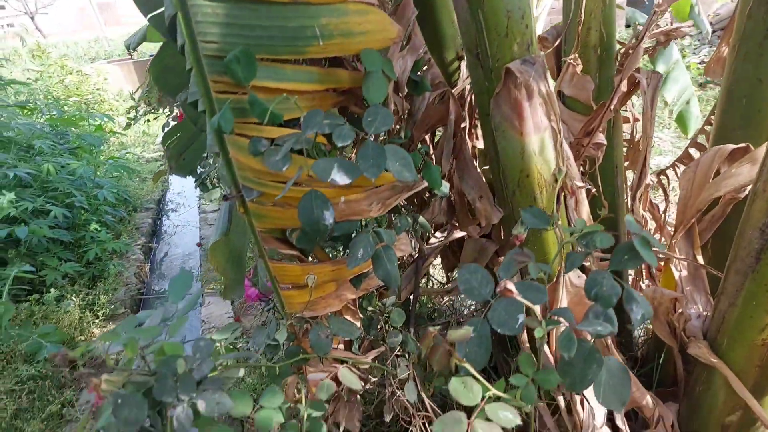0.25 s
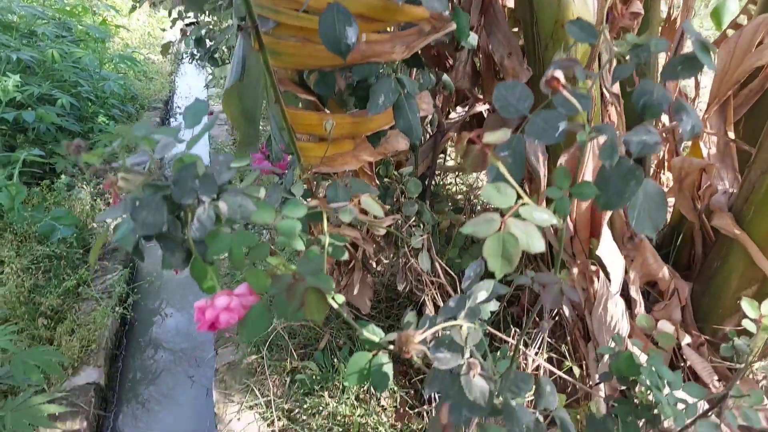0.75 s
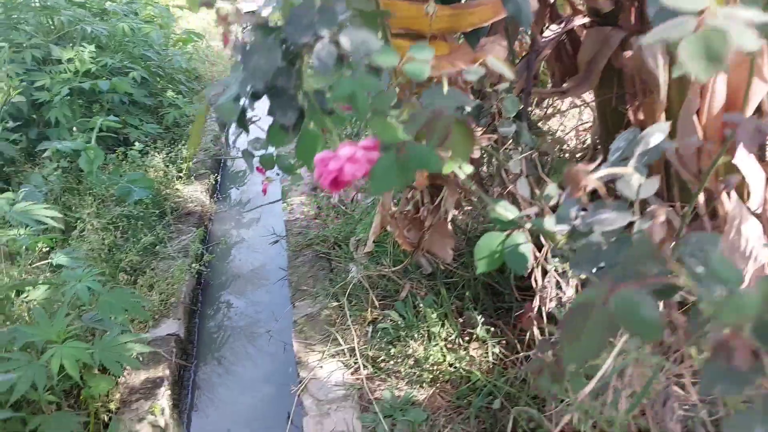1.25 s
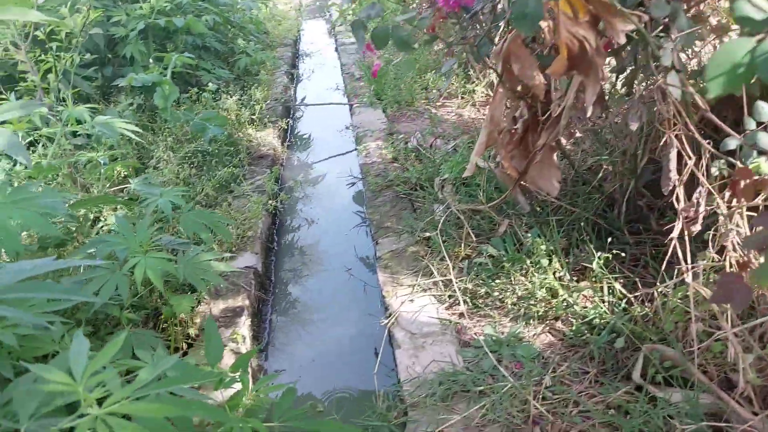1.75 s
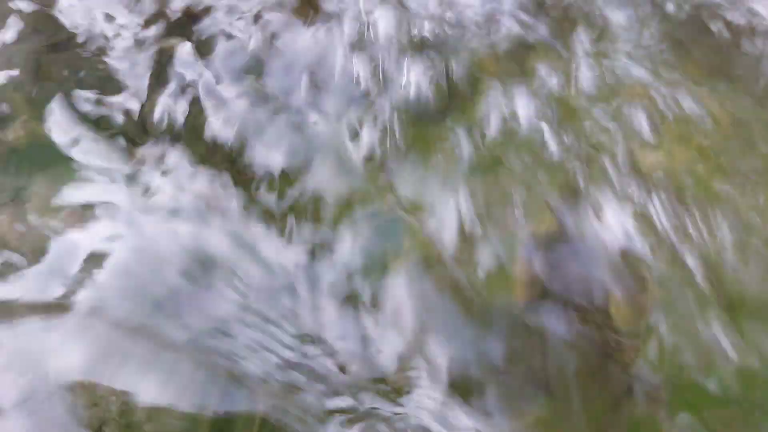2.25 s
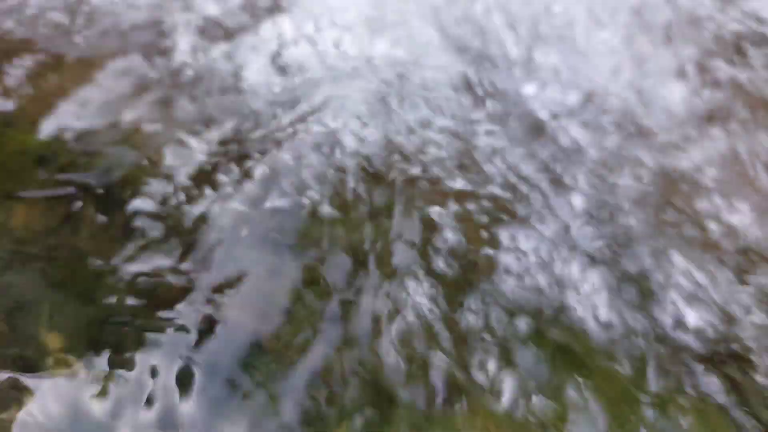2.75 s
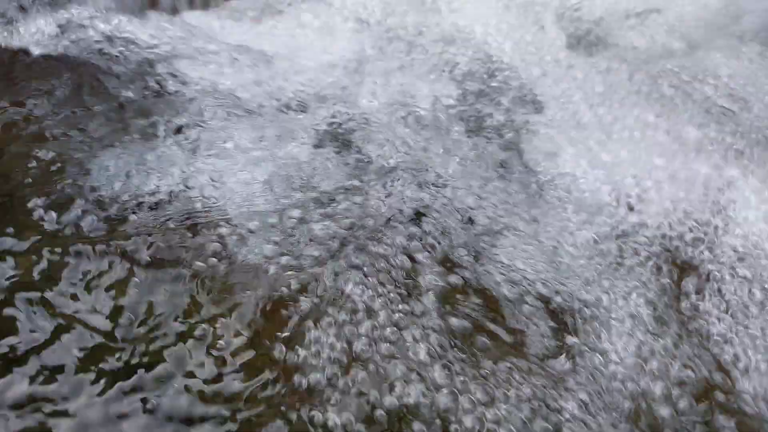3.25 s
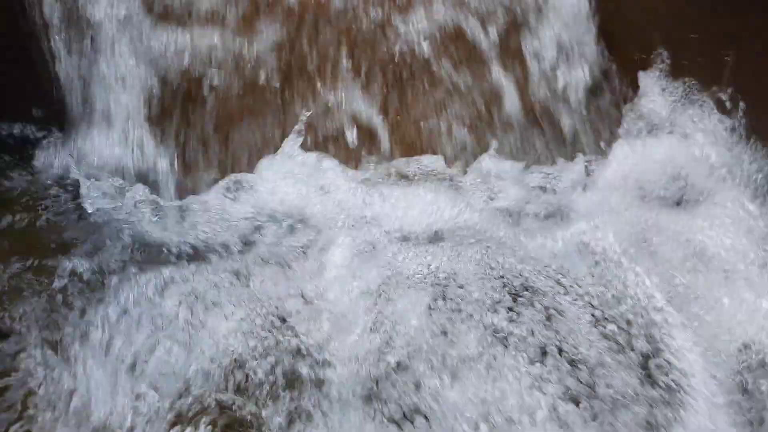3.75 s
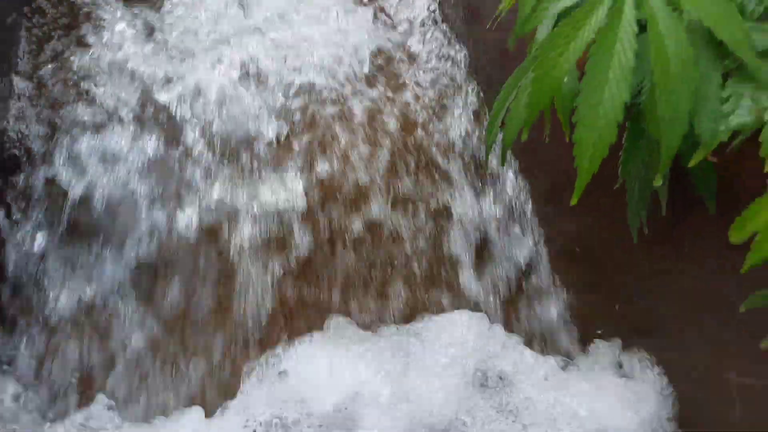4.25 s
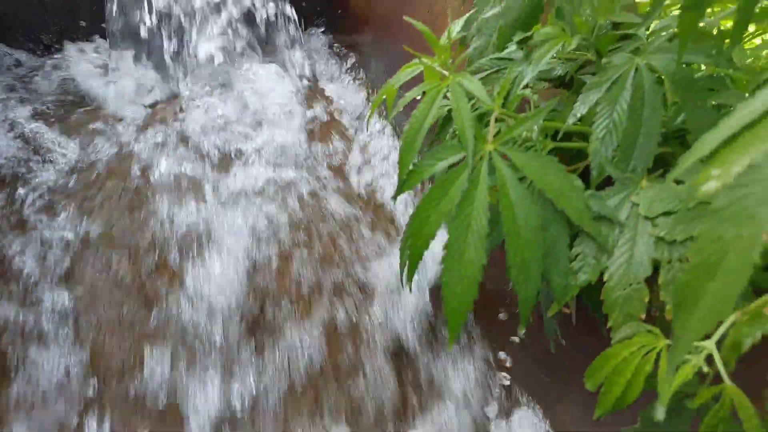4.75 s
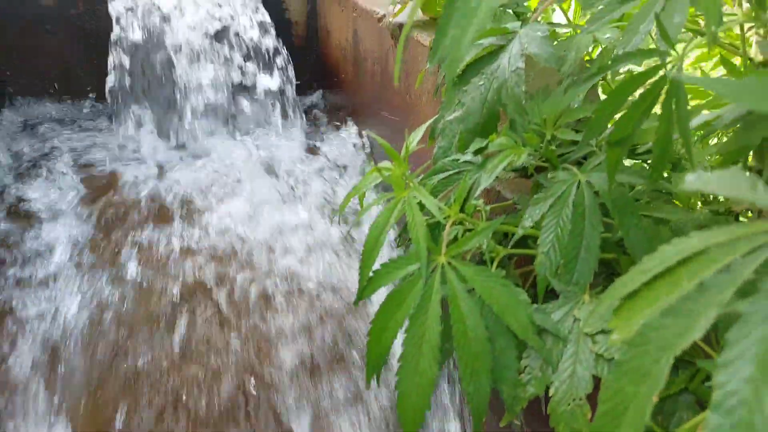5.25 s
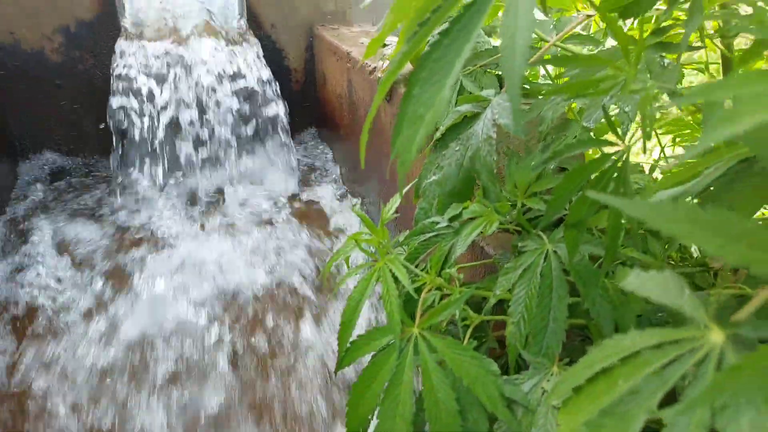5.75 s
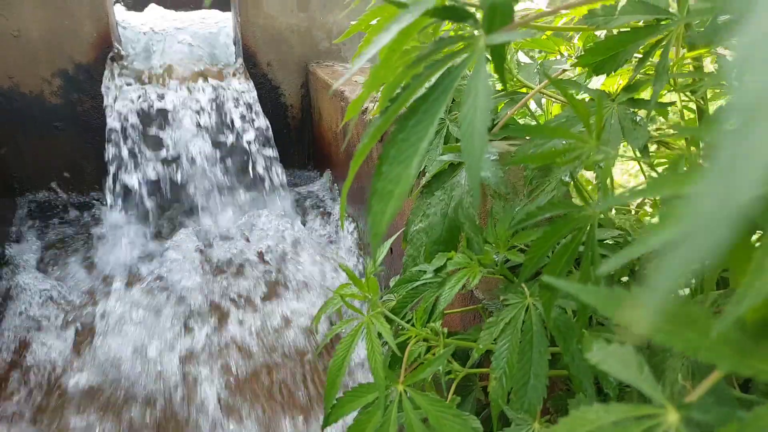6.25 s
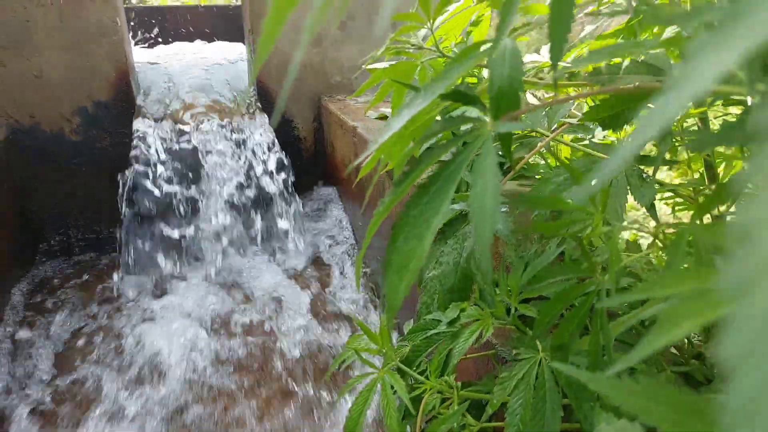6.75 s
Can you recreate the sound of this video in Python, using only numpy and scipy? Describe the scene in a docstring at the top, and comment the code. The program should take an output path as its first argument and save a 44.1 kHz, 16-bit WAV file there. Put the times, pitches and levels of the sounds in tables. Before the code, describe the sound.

For nearly two seconds there is only soft, distant running water with a dull low rumble and faint hum. After a tiny hush, heavy water gushes suddenly and stays loud to the end. The close stereo microphone catches dense wash, fizzing spray, rising bubble tones and wet slaps between concrete walls, becoming fuller and deeper as it approaches the falling jet.

```python
"""A faint rush from far down a garden channel is heard first; after a near-silent moment water gushes close by.
Pumped water falls from a concrete outlet into a basin, and the microphone moves upstream over the foam to the fall.
The water is noise swelling in octave bands, ringing bubbles and snapping drops, driven by shared random surges.
Hollow gulps are short rising tones; slaps and splashes are noise bursts; a faint wavering hum lies under the far rush.
Distance and place are set by level, spectrum and one gliding echo, heard at two microphone ports."""
import sys
import numpy as np
from scipy import signal
from scipy.fft import rfft, irfft
from scipy.io import wavfile
from scipy.ndimage import uniform_filter1d

SR = 44100
rng = np.random.default_rng(int(sys.argv[2]) if len(sys.argv) > 2 else 0)


def bounce(signal):
    """Save signal as a 16-bit WAV file at the path given by the first command-line argument."""
    frames = np.transpose(np.atleast_2d(signal))
    limited = np.clip(frames, -1, 1)
    pcm = np.round(limited * 32767).astype(np.int16)
    wavfile.write(sys.argv[1], SR, pcm)


N = 308700
TIME = np.arange(N) / SR
BINS = np.fft.rfftfreq(N, 1 / SR)

# Colour of the near water at four places along the walk.
# Each row: frequency in Hz, left and right port in relative dB.
RUNOFF_COLOUR = [(30, -30, -38), (60, -21, -20), (125, -8, -9.5), (330, -8.5, -9), (576, -4.5, -0.5),
                 (620, -6.5, -9.5), (950, -5.5, -5), (1500, -12, -7), (2060, -17, -7.5), (3200, -23.5, -16),
                 (4800, -25, -16), (6900, -25.5, -6.5), (8300, -26, -30), (9760, -26.5, -24.5),
                 (12240, -25, -9.5), (15500, -29, -32)]
FOAM_COLOUR = [(30, -22, -26), (60, -21, -18), (128, -11.5, -12.5), (252, -9, -8.5), (460, -9.5, -6.5),
               (614, -6, -5.5), (1270, -13, -8.5), (2060, -13.5, -8), (3020, -18, -11.5),
               (4560, -20.5, -11), (6570, -19, -4.5), (7900, -23, -26.5), (9760, -23, -23.5),
               (12000, -22, -8), (15500, -23, -31)]
APRON_COLOUR = [(30, -25, -25), (60, -14, -23), (129, -12, -7), (196, -10.5, -15), (320, -7, -3.5),
                (790, -9.5, -8.5), (990, -6.5, -3.5), (1530, -10.5, -6.5), (2130, -11.5, -3),
                (2850, -17, -11.5), (3760, -19, -9), (5750, -19, -7), (8040, -20, -29), (10000, -19, -20.5),
                (11900, -19, -13), (15500, -19, -28)]
FALL_COLOUR = [(30, -31.0, -7), (60, -14, -4.5), (129, -0.5, 0), (191, -4.5, -7), (330, 2, 4),
               (1030, 0, 2.5), (1460, -11.5, -3.5), (2020, -12, -3.5), (2750, -17, -9.5), (5660, -21, -11),
               (6330, -17, -21.5), (7900, -20.5, -28), (10000, -18.5, -25.5), (11800, -20, -20),
               (16200, -21, -40)]
# Times in seconds when the microphone is over the runoff, the foam, the apron and the fall.
NEAR_PLACE_TIMES = [2.35, 3.3, 4.65, 5.9]

# Colour of the far water among the plants and on the open bank.
# Each row: frequency in Hz, left and right port in relative dB.
PLANTS_COLOUR = [(30, -22, -13), (57, -10, -2), (80, -16, -8.5), (122, -3.5, 2.5), (347, -17.5, -14.5),
                 (620, -14, -12), (1020, -12, -11.5), (1200, -26, -19), (1520, -20, -17), (1730, -25, -18),
                 (1930, -21, -10.5), (2600, -28, -20), (3220, -29.5, -26.5), (7500, -35, -28),
                 (9500, -37, -35.5), (13000, -38, -26), (16000, -43, -49)]
BANK_COLOUR = [(30, -22, -2), (80, -9, -2.5), (112, -5, 3), (160, -10, -9), (240, -12, -7),
               (344, -20.5, -19), (1070, -18.5, -15.5), (1320, -23, -21.5), (2000, -30, -22),
               (2670, -29, -18.5), (3350, -34, -31), (7600, -38, -28.5), (9500, -37, -37.5),
               (13000, -39, -29.5), (16000, -40, -46)]
# Times in seconds when the microphone is among the plants and on the open bank.
FAR_PLACE_TIMES = [0.35, 1.6]

# Level of the water along the way, before gushes and sloshing.
# Each row: time in seconds, churning in dB, splashing in dB.
NEAR_LEVELS = [(1.98, -26.5, -27), (2.7, -26.5, -28.5), (3.7, -26, -27.5), (4.8, -26.5, -26.5),
               (5.6, -26.5, -27.5), (6.2, -28, -28.5), (7.0, -26, -29)]
FAR_LEVELS = [(0, -48.5, -54), (0.85, -47, -52.5), (1.35, -48, -50.5), (1.7, -47, -53), (1.8, -44, -52)]
# Gushes from the pump. Each row: crest in seconds, lift of the churning in dB, lift of the splashing in dB.
PUMP_GUSHES = [(1.22, 2, 1), (1.39, 1, 0.5), (2.1, 1.5, 3.5), (2.29, 0.5, 3), (2.42, 2, 3), (2.53, -2, 1),
               (2.95, -1, 3), (3.36, 3.5, 1), (4.39, 1.5, 1.5), (4.55, 3, -0.5), (4.83, 0.5, 2.5),
               (5.35, 2.5, 2.5), (5.61, 1, 0.5), (6.47, 3.5, -1)]

# Air pockets ringing under the water. Each row: crest in seconds, pitch in Hz, peak in dB before trim.
AIR_POCKETS = [(2.071, 490, -19), (2.201, 565, -18), (2.226, 550, -16), (2.317, 550, -14),
               (2.369, 750, -23), (2.431, 550, -20), (2.523, 550, -18.5), (2.563, 555, -20.5),
               (2.611, 380, -21.5), (2.67, 390, -20), (2.765, 343, -14.5), (2.768, 242, -14.5),
               (2.797, 750, -19), (2.873, 344, -17.5), (2.927, 219, -17.5), (2.954, 535, -17),
               (2.962, 231, -15), (3.007, 267, -15), (3.143, 191, -20.5), (4.031, 420, -17.5),
               (4.115, 613, -12), (4.229, 412, -18), (4.276, 394, -19), (4.355, 460, -22),
               (4.48, 592, -17.5), (4.551, 340, -19.5), (4.637, 325, -19), (4.662, 316, -19.5),
               (4.779, 520, -21), (4.909, 592, -22), (4.956, 496, -14.5), (5.018, 372, -19.5),
               (5.032, 286, -12), (5.09, 318, -19.5), (5.334, 355, -21), (5.451, 201, -27),
               (5.573, 317, -18), (5.783, 800, -13), (5.97, 528, -4.5), (6.329, 332, -20.5),
               (6.426, 750, -20), (6.484, 318, -25), (6.524, 930, -15), (6.605, 277, -19),
               (6.686, 585, -20.5), (6.886, 1076, -14)]
# Sharp splashes. Each row: start in seconds, level in dB before trim.
SPLASH_EVENTS = [(0.8594, -35.5), (1.3728, -39), (1.7699, -36), (2.1565, -10), (3.832, -9.5), (3.893, -10),
                 (3.901, -15), (4.701, -10.5), (5.029, -12), (5.3353, -12.5), (6.9446, -8.5)]
# Lumps of water slapping the pool. Each row: start in seconds, level in dB before trim.
SLAP_EVENTS = [(0.44, -34), (2.034, -14), (2.083, -17), (2.104, -12.5), (2.358, -7), (2.412, -9.5),
               (2.461, -12), (2.532, -14), (3.296, -14), (4.061, -12.5), (4.474, -14.5), (4.8, -13),
               (4.906, -9.5), (5.381, -13), (5.562, -17), (5.774, -7.5), (5.887, -10.5), (6.44, -13.5),
               (6.818, -13)]
# Spectra of the splashes and the slaps. Each row: frequency in Hz, relative level in dB.
SPLASH_SPECTRUM = [(500, -25), (2000, -8), (4800, 6.5), (8500, -1.5), (12000, 0.5), (16000, -14)]
SLAP_SPECTRUM = [(150, -13.5), (500, -6), (900, 2), (1500, -3.5), (2300, -12), (5000, -28), (16000, -48)]

# Resonances of the air between the concrete walls. Each row: frequency in Hz, width in Hz, lift in dB.
BASIN_RESONANCES = [(131, 25, 5.4), (239, 40, 2.2), (343, 50, 3)]
# One reflection, gliding as the microphone moves.
# Each row: time in seconds, left delay in seconds, right delay in seconds, signed strength.
WALL_REFLECTION = [(1.96, 0.0059, 0.0047, -0.25), (2.3, 0.0065, 0.0044, -0.38), (3.3, .0068, .00455, -0.18),
                   (4.2, 0.0056, 0.0044, 0.047)]
GROUND_REFLECTION = [(0, 0.0013, 0.0019, 0.11), (.7, 0.0013, 0.0016, 0.15), (1.2, 0.00174, 0.0021, 0.069),
                     (1.8, 0.0021, 0.00195, 0.33)]
# Hollow in the right-hand hiss, sliding down as the microphone tilts up to the fall.
# Each row: time in seconds, centre in Hz.
HISS_HOLLOW = [(2.0, 6800), (2.8, 6300), (3.75, 5800), (4.15, 5200), (4.5, 4850), (5.0, 4400), (5.9, 3520),
               (7.0, 3230)]
# Likeness of the two microphone ports. Each row: frequency in Hz, coherence from 0 to 1.
PORT_LIKENESS = [(40, 0.9), (150, 1), (400, 0.97), (600, 0.79), (900, 0.52), (1400, 0.37), (2200, 0.19),
                 (5000, 0.008), (12000, 0.036)]
# Hum from place to place. Each row: time in seconds, fundamental in dB, octave in dB, both before trim.
HUM_LEVELS = [(0.05, -59, -69), (0.42, -50.5, -67), (0.8, -69, -59), (1.08, -75, -57), (1.22, -52, -51.5),
              (1.46, -50, -59), (1.7, -62, -69)]

FAR_END_S, NEAR_START_S = 1.8, 1.9615
PORT_LAG_S = 0.000459  # the right port hears the treble this much later, the bass less
EDGE_HZ = 16000
GUSH_RISE_S, GUSH_FALL_S = 0.04, 0.043  # every gush swells and ebbs alike
SLOSH_HZ = 5.1  # the near pool sloshes at random
GULP_SWELL_S, GULP_SWELL_HZ = 0.0055, 447.8  # swell time of a gulp of this pitch; lower ones last longer
GULP_BURST_DB, GULP_HALVING_DB = -19, 20  # above this level, half the swell time for every such step


def near_water(surge_db=1.06, foam_bubbles_db=-6, clear_bubbles_db=-8.0, spray_db=-4, slosh_db=.5):
    """The jet plunges into the basin: wash, bubbles and spray surge together."""
    surge = surge_db * surges(per_s=110, decay_s=.014)
    water = wash(surge, patchy_db=1.93, patch_hz=45, bass_share=0.73)
    # bubbles smothered in foam ring briefly, those in clear water longer
    water += gain_of(foam_bubbles_db) * bubbles(surge, per_s=1000, cycles=3.6, rise=0.04, spread_db=1.5)
    water += gain_of(clear_bubbles_db) * bubbles(surge, per_s=260, cycles=11.86, rise=0.021, spread_db=2.5)
    water += gain_of(spray_db) * spray(surge, per_s=2200, spread_db=3.5, tick_s=0.00092)

    heard = ports(enclosed(water, BASIN_RESONANCES))
    heard = echoed(heard, WALL_REFLECTION)
    places = [RUNOFF_COLOUR, FOAM_COLOUR, APRON_COLOUR, FALL_COLOUR]
    heard = hollowed(carried(heard, places, NEAR_PLACE_TIMES))
    lift = gushing() + slosh_db * wander(SLOSH_HZ)
    return flowing(heard, NEAR_LEVELS, lift)


def wash(surge_db, patchy_db, patch_hz, bass_share):
    """Countless merged bubbles: every octave follows the surges and also seethes by itself."""
    white = rfft(rng.standard_normal((2, N)))
    out = np.zeros((2, N))
    centres = np.geomspace(100, 12800, 8)
    for centre, pick in zip(centres, np.eye(len(centres))):
        weight = np.interp(np.log(BINS + 1), np.log(centres), pick)
        band = irfft(white * weight, N)
        surge_share = np.interp(centre, [200, 3000], [bass_share, 1])
        out += band * gain_of(surge_share * surge_db + patchy_db * wander(patch_hz))
    return evened(out)


def bubbles(surge_db, per_s, cycles, rise, spread_db, count=14):
    """Each bubble rings for a few cycles, rising in pitch as it nears the surface; small ones are commoner."""
    out = np.zeros((2, N))
    edges = np.geomspace(160, 5000, count + 1)
    for low, high in zip(edges, edges[1:]):
        life = cycles / high * (high / 600) ** 0.44
        t = np.arange(int(5 * life * SR)) / SR
        chance = per_s / count * np.sqrt(high / 1000) * gain_of(surge_db) / SR
        side, at = np.nonzero(rng.random((2, N)) < chance)
        pitch, size = rng.random((len(at), 2)).T[:, :, None]
        hz = low * (high / low) ** pitch
        tone = np.sin(2 * np.pi * hz * t * (1 + rise * t / life))
        ring = tone * np.exp(-t / life) * (1 - np.exp(-t * high))
        ring *= gain_of(spread_db * np.minimum(-np.log(size), 3.5))  # a few are much louder
        # sum all rings of this size group into both channels at once
        places = (side * N + at)[:, None] + np.arange(len(t))
        group = np.bincount(places.ravel(), ring.ravel(), 2 * N)[:2 * N].reshape(2, N)
        out += np.sqrt(high) * evened(group)
    return evened(out)


def spray(surge_db, per_s, spread_db, tick_s):
    """Drops snap on the surface, each with its own small delay between channels and a short hiss."""
    at = np.flatnonzero(rng.random(N) < per_s * gain_of(2 * surge_db) / SR)
    size = gain_of(spread_db * np.minimum(rng.exponential(1, len(at)), 4))
    size = size * rng.choice([-1, 1], len(at))
    drops = np.zeros((2, N))
    late = np.minimum(at + rng.integers(0, 32, len(at)), N - 1)
    drops[0, late] = size
    drops[1, at] = size
    patter = signal.lfilter([1], [1, -np.exp(-1 / (tick_s * SR))], drops ** 2)
    hiss = np.sqrt(patter) * rng.standard_normal((2, N))
    return evened(evened(drops) + hiss)


def surges(per_s, decay_s):
    """Lumps of water land at random: each raises the noise at once and dies away."""
    lumps = (rng.random(N) < per_s / SR) * rng.uniform(.3, 1, N)
    shots = signal.lfilter([1], [1, -np.exp(-1 / (decay_s * SR))], lumps)
    return evened(shots - shots.mean())


def gushing():
    """Level change of the churning and of the splashing in dB: each gush builds to its crest and ebbs."""
    total = 0
    for s, *lifts in PUMP_GUSHES:
        width = np.where(TIME < s, GUSH_RISE_S, GUSH_FALL_S)
        total = total + np.outer(lifts, np.exp(-((TIME - s) / width) ** 2))
    return total


def gulps(trim_db=-1.0, left_over_right_db=-2, rise=0.021, wobble=0.058):
    """A trapped air pocket swells, rings a few wobbling cycles with rising pitch and is smothered by foam."""
    out = np.zeros(N)
    for s, hz, db in AIR_POCKETS:
        swell = GULP_SWELL_S * (GULP_SWELL_HZ / hz) ** (2 / 3)
        swell *= .5 ** (max(db - GULP_BURST_DB, 0) / GULP_HALVING_DB)  # loud ones burst sooner
        t = np.arange(-4 * swell, 4 * swell, 1 / SR)
        # the current kneads the pocket
        jolts = evened(uniform_filter1d(rng.standard_normal(SR), size=round(2 * SR / hz)))[:len(t)]
        turns = hz * t * (1 + rise * t / swell / 2) + wobble * jolts + rng.random()
        envelope = gain_of(db + trim_db) * np.exp(-(t / swell) ** 2 / 2)
        add(out, s + t[0], envelope * np.sin(2 * np.pi * turns))
    return balanced(out, left_over_right_db)


def crackles(events, colour, trim_db, rise_s, decay_s, left_over_right_db):
    """Thrown water slaps down and scatters into a short crackle: a burst of uneven noise."""
    out = np.zeros((2, N))
    t = np.arange(3000) / SR
    for s, db in events:
        grains = gain_of(2.7 * rng.standard_normal(len(t)))
        crackle = evened(rng.standard_normal((2, len(t))) * grains)
        envelope = np.exp(-t / decay_s) * (1 - np.exp(-t / rise_s))
        add(out, s, gain_of(db + trim_db) * crackle * envelope)
    shape = evened(gain_of(read(colour, BINS)))
    return balanced(irfft(rfft(ports(out)) * shape, N), left_over_right_db)


def thump(at_s=6.222, hz=60, level_db=-23, length_s=0.0055):
    """One soft, low bump, mostly on the right: a sine under a bell-shaped swell."""
    t = TIME - at_s
    bump = gain_of(level_db) * np.exp(-(t / length_s) ** 2 / 2) * np.sin(2 * np.pi * hz * t)
    return bump * np.array([[.3], [1]])


def far_water(surge_db=0.9, bubbles_db=-8.0, spray_db=-8):
    """From down the channel: a low rumble and a soft, trickling rush of wash, bubbles and spray."""
    surge = surge_db * surges(per_s=80, decay_s=0.015)
    water = wash(surge, patchy_db=2.8, patch_hz=30, bass_share=0.63)
    water += gain_of(bubbles_db) * bubbles(surge, per_s=750, cycles=11.2, rise=0.02, spread_db=2.5)
    water += gain_of(spray_db) * spray(surge, per_s=980, spread_db=3.5, tick_s=0.00077)
    heard = echoed(ports(water), GROUND_REFLECTION)
    heard = carried(heard, [PLANTS_COLOUR, BANK_COLOUR], FAR_PLACE_TIMES)
    return flowing(heard, FAR_LEVELS, gushing())


def pump(hz=89.0, trim_db=1, waver=0.0061, left_over_right_db=-2.0):
    """A faint hum and its octave, likely the distant pump, wavering slightly in pitch."""
    s, *levels = np.transpose(HUM_LEVELS)
    turns = np.cumsum(hz * (1 + waver * wander(1.8))) / SR
    hum = np.zeros(N)
    for harmonic, db in enumerate(levels, 1):
        hum += gain_of(np.interp(TIME, s, db) + trim_db) * np.sin(2 * np.pi * harmonic * turns)
    return balanced(np.sqrt(2) * hum, left_over_right_db)  # table levels are rms


def enclosed(x, modes):
    """The air between the concrete walls rings in a few low modes."""
    ring = 1 + sum((gain_of(db) - 1) / (1 + 2j * (BINS - hz) / width) for hz, width, db in modes)
    return irfft(rfft(x) * ring, N)


def ports(x):
    """Two microphone ports: alike in the bass, nearly unrelated in the treble, the right one late."""
    left, other = rfft(x)
    same = np.clip(read(PORT_LIKENESS, BINS), 0, 1)
    lag = PORT_LAG_S * BINS / np.hypot(BINS, 1200)
    right = same * left + np.sqrt(1 - same ** 2) * other
    right = right * np.exp(-2j * np.pi * BINS * lag)
    return irfft(np.array([left, right]), N)


def echoed(x, path):
    """Adds one reflection with a gliding delay, which combs the rush."""
    s, *delays, strength = np.transpose(path)
    late = [np.interp(TIME - np.interp(TIME, s, delay), TIME, side) for side, delay in zip(x, delays)]
    return x + np.interp(TIME, s, strength) * np.array(late)


def carried(x, places, times):
    """The colour glides from place to place as the microphone is carried along."""
    hz, t, z = signal.stft(x, SR, nperseg=2048)
    nearness = np.array([np.interp(t, times, pick) for pick in np.eye(len(places))])
    colours = np.array([[read(place, hz, axis=side + 1) for place in places] for side in range(2)])
    glide_db = colours.transpose(0, 2, 1) @ nearness
    audible = (hz > 25)[:, None]
    return signal.istft(z * gain_of(glide_db) * audible, SR)[1][:, :N]


def hollowed(x, depth_db=12.0, width_hz=900):
    """Carves the gliding hollow out of the right port."""
    hz, t, z = signal.stft(x, SR, nperseg=1024)
    offset = hz[:, None] - np.interp(t, *np.transpose(HISS_HOLLOW))
    z[1] *= gain_of(-depth_db * np.exp(-(offset / width_hz) ** 2 / 2))
    return signal.istft(z, SR)[1][:, :N]


def flowing(x, flow, lift_db):
    """Low churning and high splashing take their level from the microphone's place and swell with the flow."""
    s, *levels = np.transpose(flow)
    low = irfft(rfft(x) / (1 + (BINS / 1200) ** 8), N)
    out = np.zeros((2, N))
    for band, level, swell in zip((low, x - low), levels, lift_db):
        power = uniform_filter1d(band.mean(0) ** 2, size=7000)  # evens the level over about 0.16 s
        out += band / np.sqrt(abs(power) + 1e-20) * gain_of(np.interp(TIME, s, level) + swell)
    return out


def gain_of(db):
    """Decibels to amplitude."""
    return 10 ** (np.asarray(db) / 20)


def evened(x):
    """Scales to rms 1."""
    return x / np.sqrt(np.mean(x ** 2) + 1e-20)


def balanced(x, left_over_right_db):
    """Sets the left against the right, half the difference on each side."""
    return x * gain_of([[left_over_right_db / 2], [-left_over_right_db / 2]])


def read(points, hz, axis=1):
    """One column of a spectrum table on a log-frequency axis."""
    table = np.transpose(points)
    return np.interp(np.log(hz + 1), np.log(table[0] + 1), table[axis])


def add(mix, s, sound):
    """Lays a sound into the mix at time s."""
    part = mix[..., max(round(s * SR), 0):][..., :sound.shape[-1]]
    part += sound[..., :part.shape[-1]]


def wander(rate_hz):
    """Smooth chance of rms 1, changing up to about the given rate."""
    return evened(irfft(rfft(rng.standard_normal(N)) * np.exp(-(BINS / rate_hz) ** 2), N))


def scene():
    """The far rush with its hum, then the gush close by; gulps, slaps and splashes lie over them."""
    near = np.clip((TIME - NEAR_START_S) / .001, 0, 1)
    near_bed = near_water() + thump()
    far_bed = far_water() + pump()
    splashes = crackles(SPLASH_EVENTS, SPLASH_SPECTRUM, trim_db=-7, rise_s=0.00059, decay_s=0.005,
                        left_over_right_db=-2.5)
    slaps = crackles(SLAP_EVENTS, SLAP_SPECTRUM, trim_db=-3.0, rise_s=0.0017, decay_s=0.0088,
                     left_over_right_db=-4.5)
    return near * near_bed + (1 - near) * far_bed + gulps() + slaps + splashes


def record(dry):
    """The microphone's low cut, a near-silent moment between the two places, then the band limit."""
    low_cut = signal.butter(4, 42, "high", fs=SR, output="sos")
    thinned = signal.sosfilt(low_cut, dry)
    running = np.clip((FAR_END_S - TIME) / 0.011 + .5, gain_of(-47), 1)
    thinned *= np.maximum(running, TIME >= NEAR_START_S)
    band_limit = signal.firwin(511, EDGE_HZ, window=("kaiser", 9), fs=SR)
    return signal.oaconvolve(thinned, band_limit[None], "same")


dry = scene()
out = record(dry)
bounce(out)
```